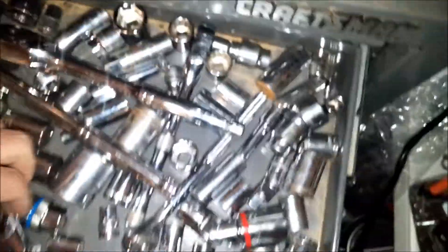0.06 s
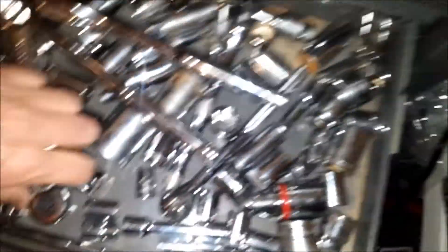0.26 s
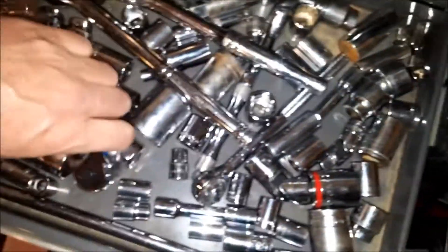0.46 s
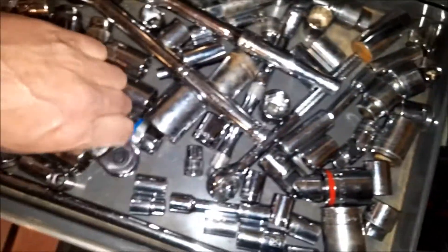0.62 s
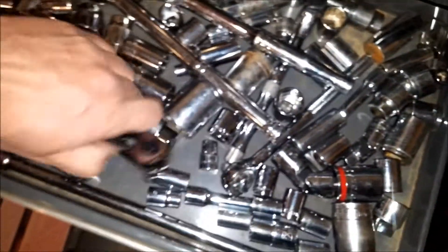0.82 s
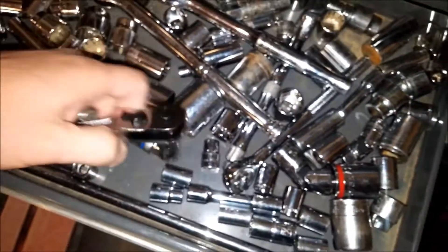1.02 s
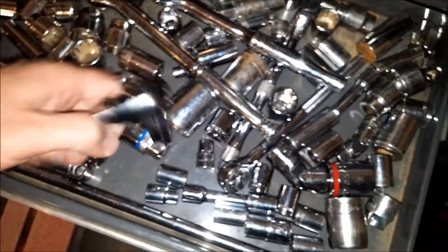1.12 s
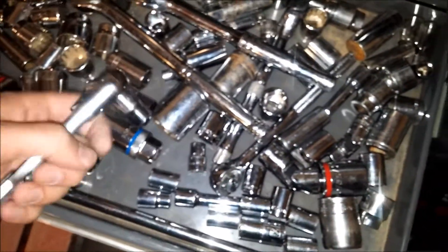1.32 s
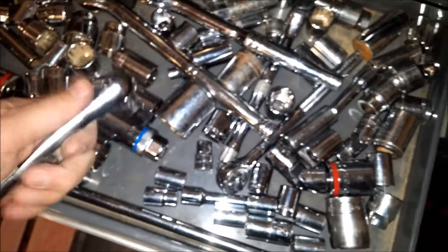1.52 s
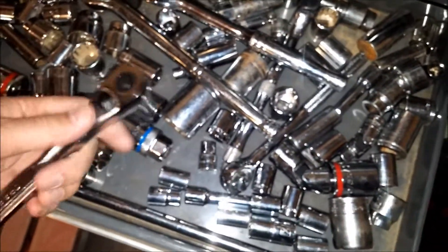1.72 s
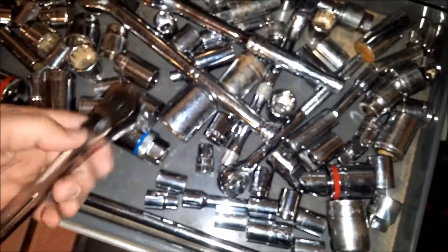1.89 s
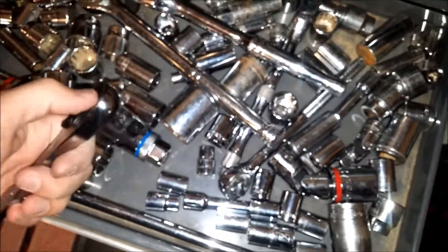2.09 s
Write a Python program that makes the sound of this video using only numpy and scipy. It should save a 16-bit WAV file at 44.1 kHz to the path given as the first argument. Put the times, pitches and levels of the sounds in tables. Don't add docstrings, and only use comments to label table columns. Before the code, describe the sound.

Metal sockets clatter in a sheet-metal drawer, close up. Light knocks at the start, denser clanks from 0.2 s, then a heavy piece lands at 0.4 s in a tight triple hit, loud and slightly distorted. From 0.5 to 0.9 s hollow thuds and scraping, with a bright ring near 0.7 s. After 1 s only small ratchet rattles, sharpest near 1.7 s, over faint hiss in a quiet garage.

```python
import sys
import numpy as np
from scipy import signal
from scipy.fft import rfft, irfft
from scipy.io import wavfile

SR = 44100
rng = np.random.default_rng(int(sys.argv[2]) if len(sys.argv) > 2 else 0)


def wav_record(signal):
    frames = np.transpose(np.atleast_2d(signal))
    bounded = np.clip(frames, -1, 1)
    quanta = np.round(bounded * 32767).astype(np.int16)
    wavfile.write(sys.argv[1], SR, quanta)


def voltage_ratio(decibels):
    exponent = np.asarray(decibels, float) / 20
    return 10 ** exponent


N = 94815
HZ = np.maximum(np.arange(N // 2 + 1) * SR / N, 1)
TAIL_S = np.arange(SR // 5) / SR
TAIL_HZ = np.maximum(np.arange(len(TAIL_S) // 2 + 1) * 5, 1)
WALL_RISE_S = 0.0042


def at_hz(points, hz):
    f, value = np.transpose(points)
    return np.interp(np.log(hz), np.log(f), value)


def rms_one(x):
    return x / np.sqrt(np.mean(x ** 2) + 1e-20)


def dying(t60_s, rise_s):
    rise = 1 - np.exp(-TAIL_S / max(rise_s, 1e-5))
    shape = rise * voltage_ratio(-60 * TAIL_S / max(t60_s, .005))
    return shape / shape.max()


def add(out, s, sound):
    i = int(s * SR)
    out[:, i:i + sound.shape[1]] += sound[:, :N - i]


def port_pair(mid, side, likeness):
    alike = np.clip(likeness, 0, 1)
    return np.sqrt(1 + alike) * mid + np.sqrt(1 - alike) * side * [[1], [-1]]


def struck(colour_db):
    # f/Hz, likeness [0-1]
    blow_alike = [(100, 0.95), (600, 0.9), (1500, 0.56), (12000, 0)]
    lump_db = 4
    mid, side = rng.standard_normal((2, len(TAIL_HZ), 2)) @ [1, 1j]
    lumps = np.interp(np.log2(TAIL_HZ) * 5, np.arange(80), rng.standard_normal(80))
    modes = port_pair(mid, side, at_hz(blow_alike, TAIL_HZ))
    return rms_one(irfft(voltage_ratio(colour_db + lump_db * lumps) * modes, len(TAIL_S)))


def tone(hz, t60_s, turn):
    wobble_depth, wobble_grow_s, rise_s = .65, .008, 0.00077
    drift = np.interp(TAIL_S * 250, np.arange(52), rng.standard_normal(52))
    wobble = 1 + wobble_depth * np.minimum(TAIL_S / wobble_grow_s, 1) * drift
    phase = hz * TAIL_S + np.array([[0], [turn]])
    return np.sin(2 * np.pi * phase) * wobble * dying(t60_s, rise_s)


def single_modes(table, turn_spread):
    out = np.zeros((2, N))
    for (s, hz, db, t60_s), turn in zip(table, turn_spread * rng.standard_normal(len(table))):
        add(out, s, voltage_ratio(db) * tone(hz, t60_s, turn))
    return out


def hush():
    # f/Hz, level/dB
    hush_colour = [(30, -23), (60, -8), (110, -0.5), (300, -7), (800, -11), (4300, -15.5), (9000, -23),
                   (16000, -28)]
    # f/Hz, likeness [0-1]
    hush_alike = [(100, 0.82), (1000, 0.3), (10000, .1)]
    hush_db = -66
    mid, side = rfft(rng.standard_normal((2, N)))
    noise = port_pair(mid, side, at_hz(hush_alike, HZ))
    return voltage_ratio(hush_db) * rms_one(irfft(noise * voltage_ratio(at_hz(hush_colour, HZ)), N))


def garage(x):
    t60_s, gap_s, cut_hz, level_db = 0.23, 0.0068, 9700, -18.5
    t = np.arange(SR // 2) / SR
    tail = rng.standard_normal((2, len(t))) * voltage_ratio(-60 * t / t60_s) * np.clip(t / gap_s, 0, 1)
    tail = signal.sosfilt(signal.butter(1, cut_hz, fs=SR, output="sos"), tail)
    tail /= np.sqrt(np.sum(tail ** 2) / 2)
    return voltage_ratio(level_db) * signal.fftconvolve(x, tail, axes=1)[:, :N]


def ports(x):
    # f/Hz, level/dB
    left_over_right = [(200, 0.5), (2000, 1.5), (9000, -6), (14000, -5)]
    left_lead_s = .00016
    hz = np.arange(N // 2 + 1) * SR / N
    half = voltage_ratio(at_hz(left_over_right, HZ) / 2) * np.exp(1j * np.pi * hz * left_lead_s)
    return irfft(rfft(x) * np.array([half, 1 / half]), N)


def shove():
    # t/s, level/dB
    strength = [(0, -43), (.06, -47.5), (.14, -49), (.165, -52), (0.194, -51), (.215, -37.5), (.33, -32.5),
                (.45, -37), (0.542, -41), (.57, -54), (.7, -39.5), (.78, -41.5), (.82, -52.5), (1.0, -56.5),
                (1.1, -68.5)]
    # f/Hz, level/dB
    heap_colour = [(60, -39), (190, -6.5), (540, -8.5), (1200, -0.5), (2220, -5), (9150, -20.5),
                   (15500, -24.5)]
    grains_per_s, spread_db, t60_s, rise_s = 1300, 3, 0.032, 0.00069
    sizes = voltage_ratio(spread_db * np.minimum(rng.exponential(1, N), 5)) * rng.choice([-1, 1], N)
    clicks = sizes * (rng.random(N) < grains_per_s / SR)
    dealt = rng.integers(0, 4, N)
    grains = np.zeros((2, N))
    for k in range(4):
        piece = struck(at_hz(heap_colour, TAIL_HZ)) * dying(t60_s, rise_s)
        grains += signal.fftconvolve((clicks * (dealt == k))[None], piece, axes=1)[:, :N]
    s, db = np.transpose(strength)
    return voltage_ratio(np.interp(np.arange(N) / SR, s, db, right=-120)) * rms_one(grains)


def ticks():
    # t/s, f/Hz, level/dB, t60/s
    tick_modes = [(.735, 11300, -33, .07), (.765, 11550, -42, 0.071), (.765, 10100, -47, .04),
                  (.830, 9860, -52, .05), (.885, 11460, -40.5, .05), (.910, 11000, -52.5, 0.028),
                  (.929, 9760, -40, .025), (.969, 7960, -43.5, 0.015), (.969, 10730, -55, 0.026),
                  (1.057, 10880, -47, .03), (1.255, 4200, -57, .08), (1.285, 3320, -48, 0.031),
                  (1.312, 4190, -50.5, .05), (1.547, 5580, -60, 0.028), (1.581, 2882, -50, 0.056),
                  (1.852, 7080, -60, .015), (1.857, 4250, -51.5, .06), (1.860, 2900, -54, 0.058),
                  (2.100, 1150, -60, .06), (1.703, 1750, -53, 0.044), (1.72, 1046, -53, 0.052),
                  (2.126, 4330, -55, .05), (2.128, 1915, -60.5, 0.032)]
    return single_modes(tick_modes, 0.36)


def panels():
    # t/s, f/Hz, level/dB, t60/s
    panel_modes = [(.027, 555, -30, 0.029), (.026, 900, -30, 0.032), (.030, 1810, -32.5, 0.13),
                   (.045, 240, -43.5, 0.085), (.072, 2000, -40, 0.056), (.084, 1050, -37.5, 0.046),
                   (.085, 570, -42, 0.029), (.110, 570, -43, 0.071), (.130, 570, -43, 0.035),
                   (.113, 1950, -41, 0.064), (.221, 1620, -25.5, 0.1), (.221, 1050, -27, 0.045),
                   (.294, 900, -27.5, 0.058), (.317, 550, -28, 0.038), (.368, 1610, -24.5, 0.096),
                   (.409, 353, -15.5, .03), (.4145, 681, -14.5, 0.028), (.411, 915, -15, 0.068),
                   (.413, 1199, -8.5, 0.056), (.412, 1407, -12.5, 0.033), (.4125, 2160, -7.5, 0.026),
                   (.417, 1990, -19, 0.085), (.422, 2420, -21, 0.063), (.583, 600, -37, 0.032),
                   (.613, 350, -27, 0.022), (.613, 930, -24, .04), (.614, 1930, -26, 0.028),
                   (.648, 750, -32.5, 0.07), (.678, 1080, -18.5, 0.046), (.679, 1300, -20.5, 0.035),
                   (.679, 1550, -22.5, 0.034), (.714, 1210, -24.5, 0.057), (.722, 1640, -20, 0.046),
                   (.760, 600, -35, 0.1), (.838, 1207, -44, 0.14), (1.04, 1120, -52, 0.062)]
    return single_modes(panel_modes, 0.02)


def rings():
    # t/s, f/Hz, level/dB, t60/s
    socket_modes = [(0.0725, 9710, -37.5, 0.11), (.0735, 7130, -34, .03), (0.115, 9710, -48.5, 0.28),
                    (0.2233, 6050, -34, .02), (0.322, 6200, -31, 0.011), (0.336, 8010, -15.5, .05),
                    (.3375, 10780, -16.5, .025), (.3375, 6080, -23.5, 0.017), (.3365, 3430, -29.5, .035),
                    (0.7138, 11510, -12, 0.094), (.7135, 11770, -35, 0.33), (0.7126, 9550, -21, 0.052),
                    (.7685, 2044, -34.5, 0.098), (1.035, 925, -47.5, .07), (0.9278, 5086, -44, 0.031),
                    (.9285, 902, -43.5, .07), (0.9687, 5730, -38.5, 0.038)]
    return single_modes(socket_modes, 0.13)


def rattle():
    # t/s, ring level/dB, smack level/dB, spread/s
    rattles = [(1.057, -37, -43.5, 0.0025), (1.140, -73.5, -60.5, .01), (1.245, -46, -55.5, 0.02),
               (1.266, -58, -54, 0.013), (1.286, -66, -61, 0.0027), (1.31, -52, -54.5, 0.0048),
               (1.418, -62.5, -61, 0.0033), (1.547, -60, -52, .003), (1.578, -52.5, -46.5, .008),
               (1.592, -42, -49.5, 0.0094), (1.703, -63, -57, 0.025), (1.719, -23, -38.5, 0.0051),
               (1.747, -50, -51.5, 0.0017), (1.779, -57, -47, 0.0016), (1.827, -63, -54.5, 0.015),
               (1.853, -51.5, -52.5, 0.0075), (1.890, -66, -58, 0.00088), (2.046, -65.5, -63, .001),
               (2.094, -67.5, -63, 0.012), (2.127, -60.5, -54, 0.0044)]
    # f/Hz, level/dB, t60/s
    head_modes = [(2870, -17, 0.056), (3210, -6, 0.03), (4140, -6, 0.044), (4300, -18, 0.085),
                  (5900, -14.5, 0.03), (7914, -25, 0.029), (8147, -3.5, 0.029), (10200, -10, 0.012)]
    # f/Hz, level/dB
    smack_colour = [(500, -27), (1100, -15), (2300, -3.5), (3500, -2), (6000, -8), (10000, -12.5),
                    (15000, -33.5)]
    smack_t60_s, tap_luck_db = 0.06, 3
    out = np.zeros((2, N))
    for s, ring_db, smack_db, spread_s in rattles:
        smack = struck(at_hz(smack_colour, TAIL_HZ)) * dying(smack_t60_s + 4 * spread_s, 0.42 * spread_s)
        add(out, s, voltage_ratio(smack_db - 2.5) * smack)
        for late_s in np.arange(3) * rng.uniform(0.66, 1.9, 3) * spread_s:
            for hz, db, t60_s in head_modes:
                luck, turn = rng.standard_normal(2)
                level = voltage_ratio(ring_db + db - 9 + tap_luck_db * luck)
                add(out, s + late_s, level * tone(hz, t60_s, 0.103 * turn))
    return out


def knocks():
    # t/s, floor level/dB, walls level/dB, loose sockets level/dB, floor pitch
    # f/Hz
    drawer_knocks = [(0.027, -18, -33.5, -32.5, 1260), (0.072, -33, -36, -29, 1161), (0.085, -30, -43, -42.5, 1237),
                     (0.112, -41.5, -39, -42, 559), (0.131, -43, -42, -41, 1294), (0.204, -25, -41.5, -49, 1298),
                     (0.221, -16, -24.5, -33, 672), (0.25, -17.5, -27.5, -30.5, 1261),
                     (0.295, -19, -27, -31.5, 1610), (0.319, -12, -33, -30, 1640), (0.336, -24, -22.5, -17, 556),
                     (0.368, -18, -30, -30, 620),
                     (0.523, -18.5, -37.5, -50.5, 1130), (0.583, -29, -40.5, -48, 1140),
            (0.615, -21.5, -25, -25.5, 573), (0.648, -20, -36, -30, 1180), (0.678, -13.5, -25.5, -30, 630),
            (0.714, -17, -24.5, -20, 1600), (0.734, -19, -30, -31.5, 1160), (0.76, -20.5, -32.5, -44, 1070),
            (0.83, -26.5, -42.5, -52, 890), (0.886, -56, -43.5, -44.5, 670),
            (0.928, -55, -45.5, -47.5, 920), (0.952, -60.5, -46.5, -54.5, 1493),
            (0.967, -82.5, -42.5, -43, 1472), (0.984, -69, -52, -54, 1830), (1.031, -48, -51, -54.5, 910),
                     (.260, -22, -27, -27.5, 558),
        (0.394, -19.5, -32, -37.5, 1070),
        (0.409, -7.5, -17, -14, 443),
        (0.4125, -2, -11, -13, 581),
        (0.4152, -16, -16.5, -10.5, 920),
    ]
    # f/Hz, width/Hz
    floor_plate = [(340, 120), (500, 60), (655, 54), (912, 22), (1100, 110), (1205, 73), (1400, 29),
                   (1630, 46)]
    # f/Hz, level/dB
    wall_colour = [(700, -39.5), (1300, -2), (2000, 2.5), (4500, -3), (6000, -10), (9000, -40)]
    # f/Hz, level/dB
    loose_colour = [(3000, -39), (5000, -9), (10000, 1.5), (12000, -6.5), (13200, -11.5), (16000, -21.5)]
    spot_octaves, spot_skirt_db = .8, -24.5
    push_db, push_cycles = -4, 13
    plate = sum(1 / (1 + (2 * (TAIL_HZ - hz) / width_hz) ** 2) for hz, width_hz in floor_plate)
    plate_db = 0.49 * 10 * np.log10(plate)
    thud = dying(0.068, 0.00054)
    rumble = voltage_ratio(-18) * dying(.15, WALL_RISE_S)
    wall_fall = dying(0.064, WALL_RISE_S)
    loose_fall = dying(0.062, 0.00055)
    out = np.zeros((2, N))
    for s, floor_db, wall_db, loose_db, hz in drawer_knocks:
        spot_db = np.maximum(-6 * (np.log2(TAIL_HZ / hz) / spot_octaves) ** 2, spot_skirt_db)
        floor = voltage_ratio(floor_db - 12.5) * struck(plate_db + spot_db) * (thud + rumble)
        push = voltage_ratio(floor_db + push_db) * tone(hz, push_cycles / hz, 0.0065)
        walls = voltage_ratio(wall_db + 0.5) * struck(at_hz(wall_colour, TAIL_HZ)) * wall_fall
        loose = voltage_ratio(loose_db - 5.0) * struck(at_hz(loose_colour, TAIL_HZ)) * loose_fall
        add(out, s, floor + push + walls + loose)
    return out


def scene():
    mic_low_hz = 114.7
    tools = shove() + ticks() + panels() + rings() + rattle() + knocks()
    tools = signal.sosfilt(signal.butter(2, mic_low_hz, "high", fs=SR, output="sos"), tools)
    return hush() + garage(tools) + ports(tools)


def roll_off(x):
    return signal.sosfilt(signal.butter(12, 16160, fs=SR, output="sos"), x)


def record(dry):
    clip_top, offset = 1.2, -.0003
    level = dry / clip_top
    mix = dry / (1 + level ** 4) ** (1 / 4) + offset
    return roll_off(mix)


dry = scene()
out = record(dry)
wav_record(out)
```